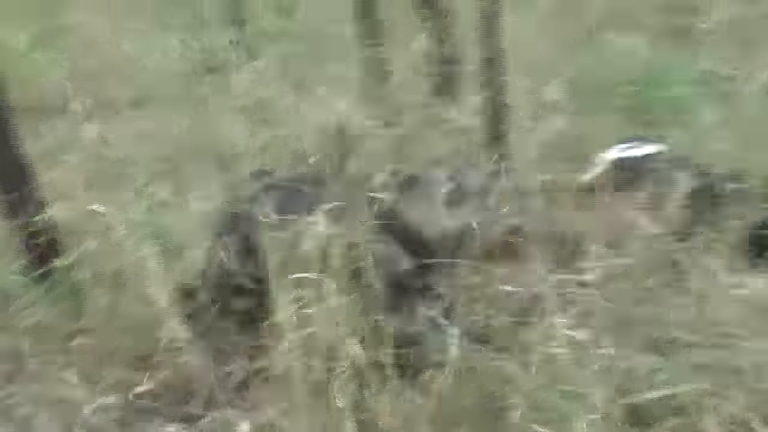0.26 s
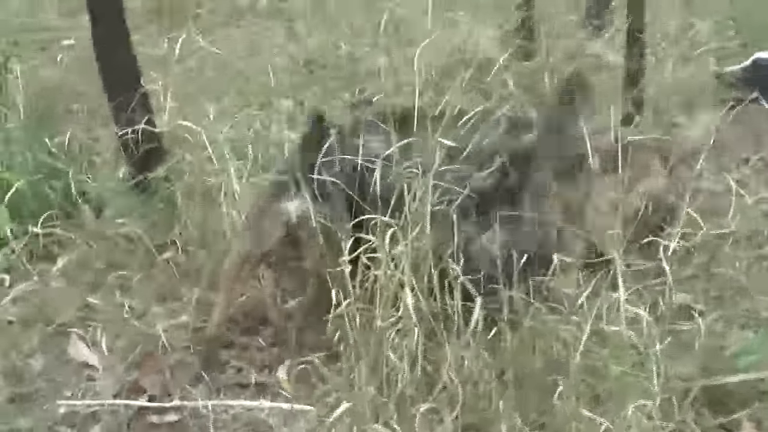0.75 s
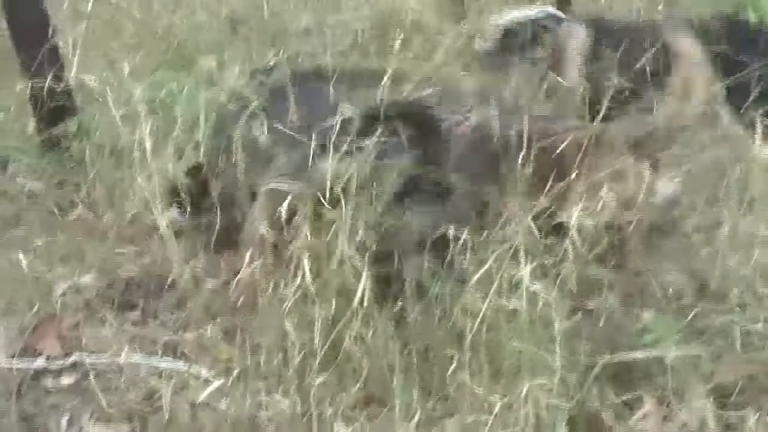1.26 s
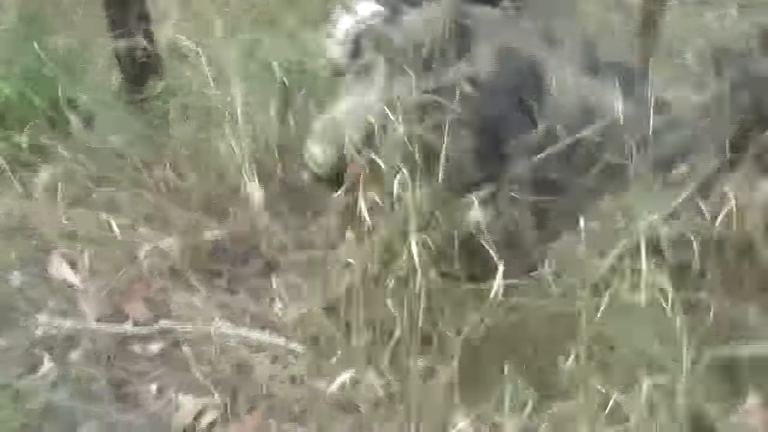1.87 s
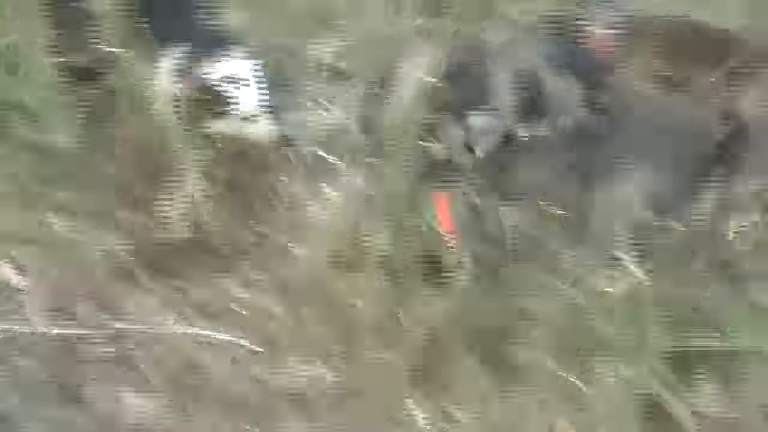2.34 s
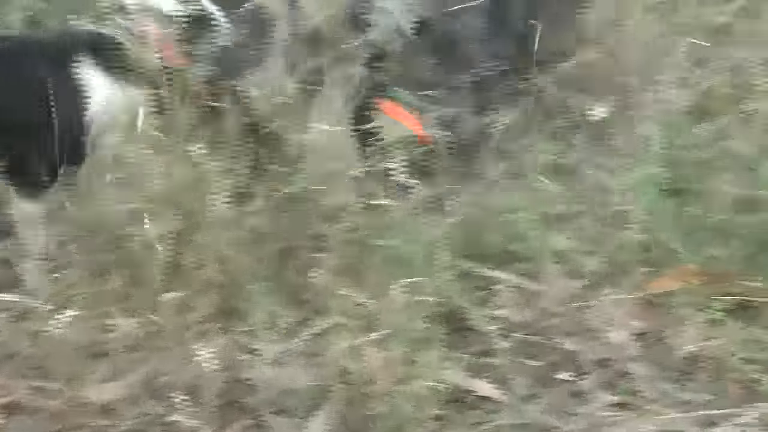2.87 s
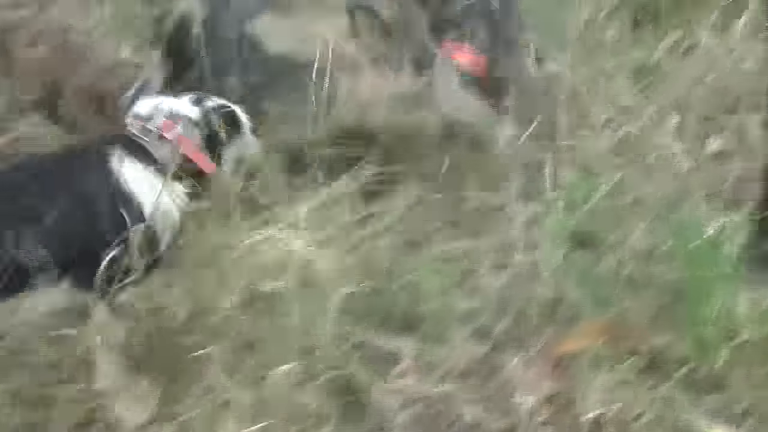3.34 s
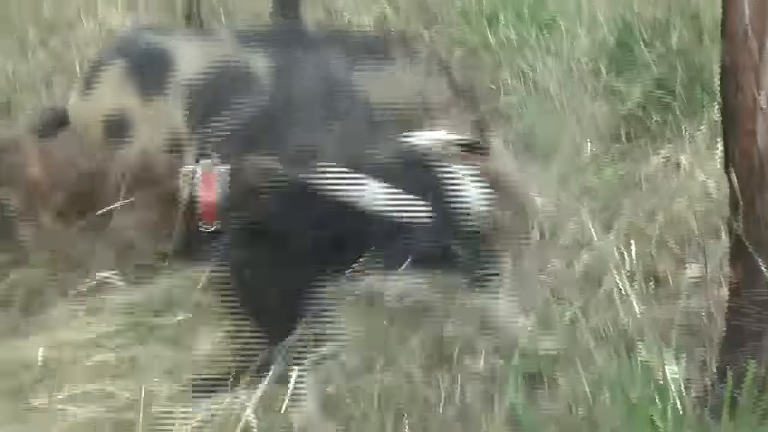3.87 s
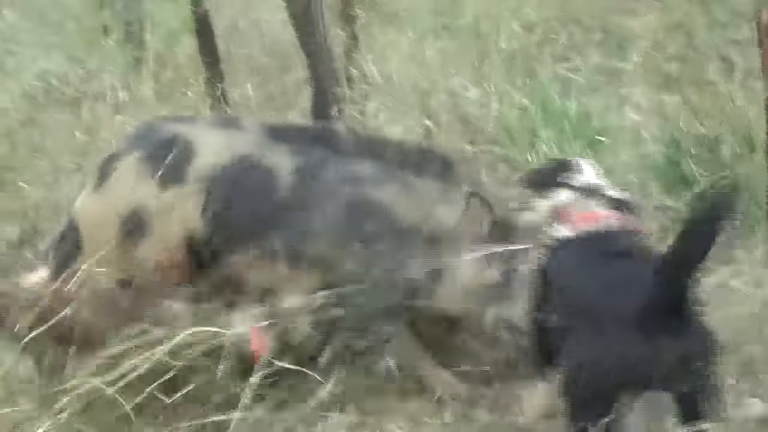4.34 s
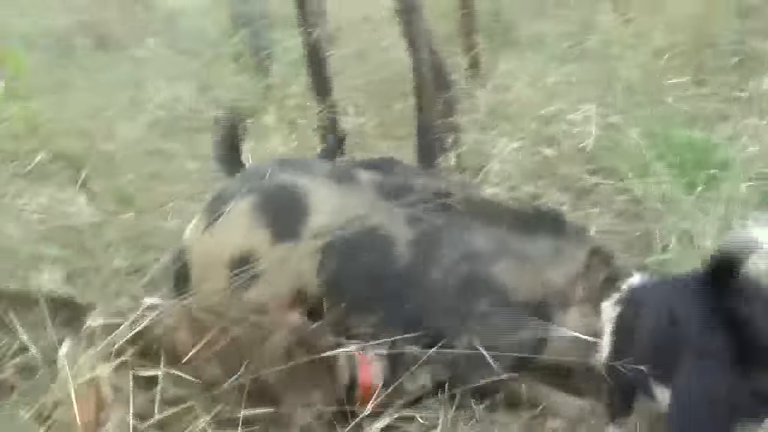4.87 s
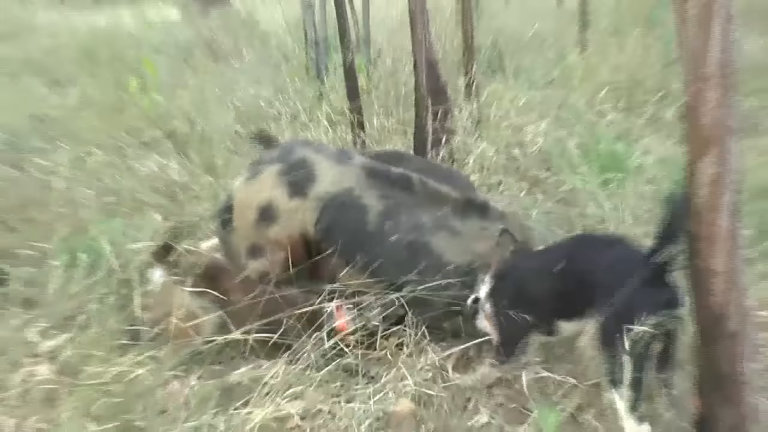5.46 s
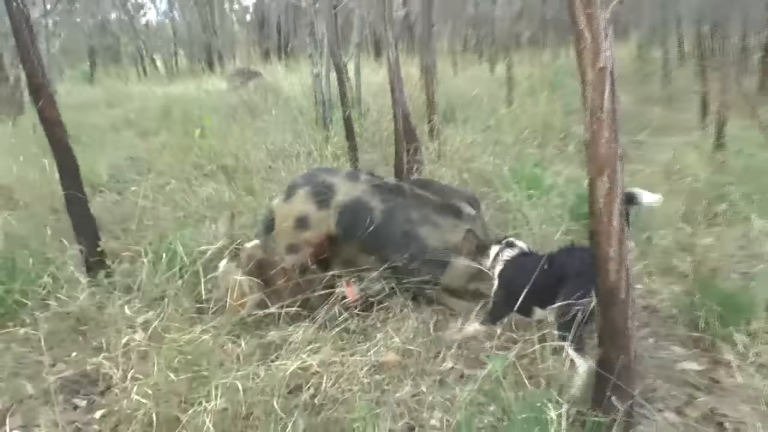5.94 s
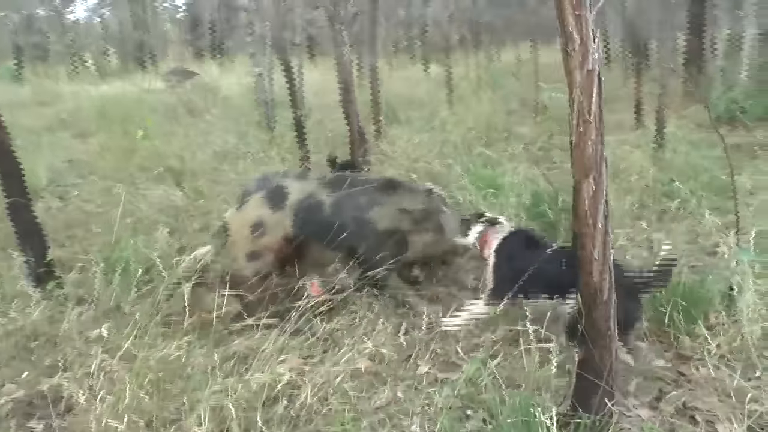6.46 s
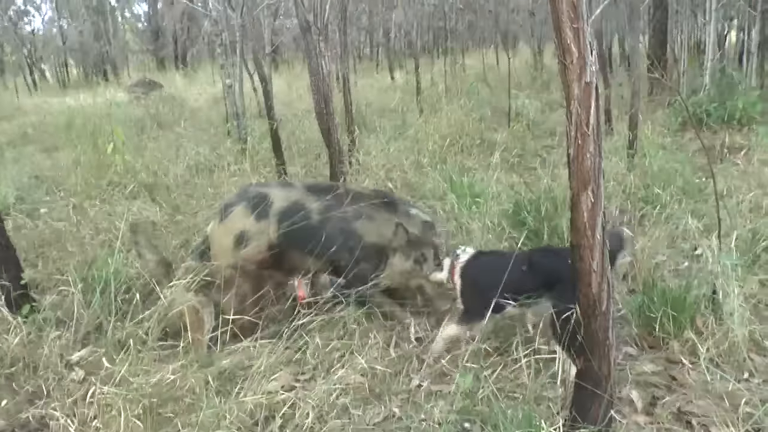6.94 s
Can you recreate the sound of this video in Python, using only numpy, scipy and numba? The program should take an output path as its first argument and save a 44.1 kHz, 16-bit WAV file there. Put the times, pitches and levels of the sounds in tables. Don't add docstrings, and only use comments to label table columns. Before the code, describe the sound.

Dogs hold a struggling pig in dry scrub: rough growls, a short squeal, stuttering grunts, two sharp yelps, snapping stalks and thuds.

```python
import sys
import numpy as np
from scipy import signal
from scipy.fft import rfft, irfft
from scipy.io import wavfile
from scipy.ndimage import uniform_filter1d
from numba import njit

SR = 44100
rng = np.random.default_rng(int(sys.argv[2]) if len(sys.argv) > 2 else 0)


def generate_wav(signal):
    frames = np.transpose(np.atleast_2d(signal))
    scaled = np.clip(frames, -1, 1) * 32767
    pcm = np.round(scaled).astype(np.int16)
    wavfile.write(sys.argv[1], SR, pcm)


def invert_db(x):
    u = np.asarray(x, float) / 20
    return 10 ** u


N = 317961
LOOP = 229320
T = np.arange(LOOP) / SR


def unit(x):
    return x / np.sqrt(np.mean(x ** 2))


def columns(rows, t):
    s, *rest = np.transpose(rows)
    return [np.interp(t, s, c) for c in rest]


def on_log(table, hz):
    f, v = np.transpose(table)
    return np.interp(np.log(hz + 1), np.log(f), v)


def walk(rate_hz, size=LOOP):
    k = max(int(SR / rate_hz), 1)
    return unit(uniform_filter1d(uniform_filter1d(rng.standard_normal(size), k), k))


@njit
def ring(x, hz, width_hz):
    y, band, low = np.empty(len(x)), 0., 0.
    for i in range(len(x)):
        g, k = np.tan(np.pi * hz[i] / SR), width_hz / hz[i]
        v = (band + g * (x[i] - low)) / (1 + g * (g + k))
        band, low, y[i] = 2 * v - band, low + 2 * g * v, k * v
    return y


def swells(rows, rest_db):
    power = invert_db(2 * rest_db)
    for s, rise_s, fall_s, db, *_ in rows:
        away = np.maximum((s - T) / abs(rise_s), (T - s) / abs(fall_s))
        power = power + invert_db(2 * (db - 12 * away))
    return 10 * np.log10(power)


# peak t/s, rise/s, fall/s, level/dB
THUDS = [(.39, .03, 0.12, -47), (.7, 0.51, 0.14, -43.5), (1.1, 0.15, 0.057, -46),
         (1.44, 0.052, 0.18, -37.5), (1.97, 0.41, 0.07, -41.5), (2.11, 0.024, 0.15, -34),
         (2.66, 0.2, 0.037, -41), (2.73, .11, 1, -51), (3.163, .021, 0.1, -35), (3.43, 0.024, 0.019, -32),
         (3.5, 0.026, 0.28, -43), (3.95, 0.1, 0.43, -42.5), (4.5, .6, .12, -54.5), (4.88, 0.13, 0.23, -40)]


def thuds():
    noise = rng.standard_normal(LOOP) + 0.44 * rng.standard_normal((2, LOOP))
    band = signal.butter(1, (45, 160), "band", fs=SR, output="sos")
    level_db = swells(THUDS, rest_db=-53.0) + 0.72 * walk(21.0)
    return invert_db(level_db) * unit(signal.sosfilt(band, noise))


# f/Hz, density/dB per Hz
GRASS_COLOUR = [(2000, 1), (3000, -1.5), (4600, 3), (6500, 7.5), (8500, 4.5), (11700, -0.5), (13000, 6),
                (16000, 12.5)]
# peak t/s, rise/s, fall/s, level/dB
THRASHES = [(.15, 0.38, 0.44, -32), (.47, 0.14, 1, -31), (.95, 0.6, 0.51, -37), (1.436, 0.039, 0.18, -30),
            (1.93, 0.22, 0.28, -25), (2.12, 0.1, 0.076, -23), (2.27, 0.12, 0.23, -21),
            (2.59, 0.11, 0.15, -21), (3.17, 0.029, 0.036, -22.5), (3.33, 0.35, 0.62, -25.5),
            (3.83, 0.083, 0.089, -29.5), (4.05, 0.23, 0.29, -29.5), (4.55, 0.74, 0.49, -29.5),
            (4.8, 0.068, 0.056, -28), (5.12, 0.27, 0.39, -30.5)]
# t/s, hold/s, recovery/s, level/dB
GAIN_DIPS = [
    (1.078, 0.098, 0.021, -4.5),
    (2.667, 0.036, 0.23, -13),
    (3.426, 0.04, 0.2, -14),
    (4.11, 0.11, 0.004, -15.5),
]


def grass(grains_per_s=2500, spread_db=2.5, hiss_db=3.0, flicker_db=2.0, dip_attack_s=0.045):
    dip_db = 0
    for s, hold_s, back_s, db in GAIN_DIPS:
        corners = s + np.cumsum([0, dip_attack_s, hold_s, back_s])
        dip_db = dip_db + np.interp(T, corners, [0, db, db, 0])
    rustle_db = swells(THRASHES, rest_db=-46.0) + dip_db
    chaff_db = -8.5 + 0.4 * dip_db

    size_db = spread_db * np.minimum(rng.exponential(size=(3, LOOP)), 4.5)
    grains = (rng.random((3, LOOP)) < grains_per_s / SR) * invert_db(size_db)
    crackle = signal.filtfilt([1], [1, -.9], grains) * rng.standard_normal((3, LOOP))
    both, *own = unit(crackle) + invert_db(hiss_db) * rng.standard_normal((3, LOOP))
    both, own = rfft(both), rfft(own)

    hz = np.fft.rfftfreq(LOOP, 1 / SR)
    colour = invert_db(on_log(GRASS_COLOUR, hz))
    out, sway_db = 0, flicker_db * walk(27.6)
    for lo, hi, db, share in ((2190, 3830, -6.5, 0.89), (4400, 7160, -3.5, 0.59), (9600, 11200, chaff_db, 0.91)):
        edge = colour / np.sqrt((1 + (lo / (hz + 1)) ** 12) * (1 + (hz / hi) ** 12))
        band = irfft((share * both + np.sqrt(1 - share ** 2) * own) * edge, LOOP)
        out = out + invert_db(rustle_db + db + sway_db + 1.27 * walk(100)) * unit(band)
    return out


# t/s, peak level/dB
TICKS = [(0.0912, -24), (0.1735, -11), (0.2862, -14), (0.3257, -22), (0.369, -21), (0.3818, -24),
         (0.3888, -24), (0.402, -17), (0.411, -11), (0.422, -18), (0.579, -6), (0.9812, -19), (1.299, -15),
         (1.3723, -25), (1.394, -16), (1.4127, -26), (1.429, -14), (1.4805, -10), (1.721, -27),
         (1.7474, -14.5), (2.032, -7), (2.092, -8), (2.1151, -13), (2.2243, -8), (2.585, 3), (2.7062, -18),
         (2.8679, -22), (3.1278, -24), (3.3423, -4), (3.4506, -22), (3.4675, -23), (3.4845, -34),
         (3.5084, -22), (3.6631, -18), (3.7504, -14), (4.2687, -22), (4.339, -10), (4.4149, -10),
         (4.4682, -10), (4.803, -13), (4.8724, -17), (4.9823, -17), (5.1607, -12)]


def ticks():
    out, t = np.zeros((2, LOOP + 512)), np.arange(512) / SR
    centre_hz = 5030 + 0 * t
    for (s, db), noise in zip(TICKS, rng.standard_normal((len(TICKS), 3, 512))):
        click = np.array([ring(noise[0] + 0.64 * own, centre_hz, 4400.0) for own in noise[1:]])
        click *= np.exp(-t / 0.0017)
        start = int(s * SR)
        out[:, start:start + len(t)] += invert_db(db - 4.5) * click / np.abs(click).max()
    return out[:, :LOOP]


# t/s, peak level/dB, f/Hz, decay/s
SNAPS = [(0.197, -9, 6560, 0.0099), (0.576, -11, 5140, 0.011), (0.9795, -11, 6950, 0.0082),
         (1.72, -17.5, 3920, 0.008), (2.032, -5, 6600, 0.0021), (2.585, -8, 5170, 0.0039),
         (3.341, -7, 6300, 0.0092), (3.754, -28, 6200, 0.0024), (4.468, -19, 6660, 0.0024),
         (4.982, 0.5, 5570, 0.00067), (4.994, -2, 5700, 0.00069), (0.288, -9, 6840, 0.00038),
         (5.167, -9, 6520, 0.0012)]
# t/s, peak level/dB, f/Hz, decay/s
SWISHES = [
    (0.362, -5.5, 4400, 0.034),
    (1.43, -11, 4050, 0.014),
    (1.888, -21, 3760, 0.0064),
    (2.114, -4, 4200, 0.0048),
    (3.135, -26, 5750, 0.029),
    (0.376, -5.5, 3260, 0.012),
]


def snaps():
    out, t = np.zeros(LOOP + 8192), np.arange(8192) / SR
    for rows, rise, width_hz in ((SNAPS, .18, 3100.), (SWISHES, .6, 2300.)):
        for (s, db, hz, decay_s), noise in zip(rows, rng.standard_normal((len(rows), 8192))):
            centre_hz = hz + 0 * t
            crack = ring(ring(noise, centre_hz, width_hz), centre_hz, width_hz)
            crack *= (1 - np.exp(-t / (rise * decay_s))) ** 2 * np.exp(-t / decay_s)
            out[int(s * SR):][:len(t)] += invert_db(db - 10.5) * crack / np.abs(crack).max()
    return out[:LOOP]


def resonance(source, air, db, hz, sharp_hz, hump_hz, broad_hz, usual_db):
    centre_hz = hump_hz + 0 * T
    hump = ring(ring(air, centre_hz, broad_hz), centre_hz, broad_hz)
    effort = np.clip(invert_db(db - usual_db), .2, 2)
    return invert_db(db) * (effort * unit(ring(source, hz, sharp_hz)) + unit(hump)) / np.sqrt(1 + effort ** 2)


# peak t/s, rise/s, fall/s, level/dB
CHEST_GROWLS = [(.17, 0.63, 0.096, -39), (.42, 0.096, 0.27, -31.5), (.58, 0.15, 0.31, -33),
                (1.065, 0.064, 0.15, -38), (1.29, 0.053, 0.025, -38), (1.5, 0.12, 0.048, -29.5),
                (1.75, 0.42, 0.53, -32.5), (2.2, 0.13, 0.26, -29), (2.64, 0.12, 0.064, -34.5),
                (3.01, 0.21, 0.1, -34.5), (3.15, 0.022, 0.6, -42.5), (3.52, 0.34, 0.19, -34),
                (4.02, 0.26, 1, -33.5), (4.478, 0.073, 0.093, -28.5), (4.62, 0.096, 0.14, -49),
                (5.08, 0.54, 0.45, -40.5)]
# t/s, f/Hz
CHEST_HZ = [(0, 336), (.8, 360), (1.5, 444), (1.62, 378), (1.9, 370), (2.2, 417), (3.3, 410), (3.53, 460),
            (3.97, 374), (4.5, 350), (5.2, 330)]
# peak t/s, rise/s, fall/s, level/dB
MOUTH_GROWLS = [(.274, 0.27, 0.89, -39), (.76, 0.12, 0.19, -43), (1.29, 0.088, 0.014, -30.5),
                (1.66, 0.17, 0.1, -34.5), (1.9, 0.09, 0.35, -39), (2.2, 0.12, 0.2, -33.5),
                (2.55, 0.12, 0.24, -35), (3.01, 0.81, 0.11, -32.5), (3.15, 0.018, 0.12, -27.5),
                (3.64, 0.084, 0.16, -39), (3.85, 0.18, 0.28, -38.5), (4.5, 1, 0.099, -48),
                (5.08, 0.44, 0.045, -37)]
# peak t/s, rise/s, fall/s, level/dB, snout f/Hz
SNORTS = [(.174, 0.25, 0.092, -34.5, 1800), (.44, 0.12, 0.19, -33.5, 1920), (.95, 0.42, 0.099, -41, 1760),
          (1.29, 0.29, 0.065, -30.5, 2070), (1.5, 0.18, 0.058, -36.5, 1400), (1.66, 0.05, 0.25, -42, 1350),
          (1.9, 0.089, 0.15, -28.5, 1830), (2.12, 0.16, 0.014, -30.5, 1340),
          (2.34, 0.011, 0.33, -32.5, 1370), (2.64, 0.065, 0.037, -29, 1980),
          (3.145, 0.016, 0.36, -30.5, 1380), (3.9, 0.15, 0.13, -31, 1640), (4.53, 1, 0.23, -37, 2020),
          (5.08, 0.38, 0.02, -36, 1880)]
# peak t/s, rise/s, fall/s, level/dB
GROANS = [
    (.25, 0.19, 0.094, -48),
    (1.08, 0.14, 0.084, -41.5),
    (2.18, 0.088, 0.057, -29),
    (2.3, 0.041, 0.028, -29.5),
    (4.45, 0.19, 0.12, -33.5),
]


def growl():
    cycles = np.cumsum(150 * np.exp(.25 * walk(50) + .25 * walk(3))) / SR
    beat_db = 2.5 * np.clip(rng.standard_normal(LOOP // 50), -1.5, 1.5)
    size = invert_db(beat_db)[cycles.astype(int)]
    pulses = unit(size * np.diff(np.floor(cycles), prepend=0))
    air = unit(size * (.5 + np.exp(-(cycles % 1) / 1.6)) * rng.standard_normal(LOOP))
    source = pulses + 0.23 * air

    chest_hz = columns(CHEST_HZ, T)[0] * np.exp(.04 * walk(6))
    mouth_hz = 830 * np.exp(.06 * walk(6))
    snout_hz = columns(SNORTS, T)[-1]
    chest = resonance(source, air, swells(CHEST_GROWLS, rest_db=-89), chest_hz, 120., 380., 800., usual_db=-33)
    mouth = resonance(source, air, swells(MOUTH_GROWLS, rest_db=-46), mouth_hz, 110., 950., 1400., usual_db=-31)
    snout = resonance(source, air, swells(SNORTS, rest_db=-78.0), snout_hz, 220., 1750., 2000., usual_db=-33)
    belly = invert_db(swells(GROANS, rest_db=-72)) * unit(ring(source, 202 + 0 * T, 62))
    return invert_db(1.2 * walk(26)) * (chest + belly + mouth + snout)


def duck(loud, knee_db=-26, depth=0.64, recover_s=0.046):
    level = uniform_filter1d(np.abs(loud), 882)
    pole = 1 / (recover_s * SR)
    level = np.maximum(level, signal.lfilter([pole], [1, pole - 1], level))
    return (1 + level / invert_db(knee_db)) ** -depth


def throb(rows, throb_hz, width_hz, edge_s):
    out, t = np.zeros(LOOP), np.arange(8192) / SR
    for s, length_s, db, from_hz, to_hz in rows:
        cycles = np.cumsum(throb_hz * np.exp(0.32 * walk(30, size=8192))) / SR
        gate = 0.23 + np.exp(-(cycles % 1) / 0.57)
        hz = from_hz + (to_hz - from_hz) * np.clip(t / length_s, 0, 1)
        air = ring(rng.standard_normal(8192), hz, width_hz)
        voice = unit(ring(gate * air, hz, 3 * width_hz))
        edges = np.clip(np.minimum(t, length_s - t) / edge_s, 0, 1)
        out[int(s * SR):][:8192] += invert_db(db) * voice * edges
    return out


# t/s, length/s, level/dB, from f/Hz, to f/Hz
MURMURS = [(1.502, 0.063, -44, 836, 810), (1.605, 0.12, -41.5, 940, 870), (1.624, 0.083, -37, 1420, 1380),
           (2.139, 0.13, -27, 805, 894), (2.165, 0.08, -33.5, 410, 402), (2.222, 0.089, -31.5, 1125, 1285),
           (3.595, 0.15, -34.5, 710, 823), (3.6, .11, -37.5, 1410, 1410), (1.79, 0.143, -38.5, 1290, 1160),
           (2.0, 0.049, -38, 1240, 1190), (2.03, 0.07, -35, 1440, 1450), (.85, .1, -44, 1080, 1150),
           (1.265, 0.1, -44, 2295, 2190), (1.29, 0.052, -39.5, 1060, 1150)]


def murmurs():
    return throb(MURMURS, throb_hz=49, width_hz=78, edge_s=0.0081)


# t/s, length/s, level/dB, from f/Hz, to f/Hz
PANTS = [
    (3.79, 0.151, -33, 1140, 1430),
    (2.87, 0.085, -36, 2130, 2220),
    (.715, 0.057, -36, 1030, 1520),
    (4.44, .11, -30, 490, 620),
    (3.15, 0.094, -36, 2300, 2200),
]


def pants():
    return throb(PANTS, throb_hz=49, width_hz=330., edge_s=0.0081)


# t/s, length/s, level/dB, from f/Hz, to f/Hz
RASPS = [(1.115, 0.044, -31, 930, 1010), (2.65, 0.027, -18, 1820, 1930), (2.7, 0.03, -20, 2100, 2020),
         (2.735, 0.051, -22.5, 1260, 1050), (2.765, 0.03, -20.5, 1430, 1610),
         (4.1, 0.068, -23.5, 2050, 1650), (4.105, 0.035, -31, 2520, 2650), (4.128, 0.056, -28, 1290, 1520),
         (4.148, 0.021, -17.5, 770, 780), (4.18, 0.052, -36, 760, 700), (4.2, 0.033, -24, 2050, 1400),
         (4.238, 0.027, -27, 1960, 1440)]


def rasps():
    return throb(RASPS, throb_hz=113, width_hz=160, edge_s=0.013)


GRUNTS = [
    (1.372, 1.391, 1.411, 1.4325, 1.4555, 1.48),
    (3.427, 3.45, 3.4668, 3.484),
    (4.053, 4.0688, 4.0887, 4.109),
    (4.7855, 4.803, 4.825, 4.8475, 4.8715),
]
# top level/dB, loudest slap, loss/dB per slap squared, upper throat/dB re chest
GRUNT_EFFORT = [
    (-9.5, 4.9, 0.35, 6),
    (-2.5, 1.0, 1.4, 4.5),
    (-5.5, 1.64, 2.9, 5.5),
    (-10.5, 2.9, 1.4, 11),
]
# t/s, peak level/dB, upper throat/dB, throat index
LONE_SLAPS = [
    (3.387, -14, -12, 1),
    (3.507, -23, 0, 1),
    (0.473, -17.5, 10, 4),
    (0.71, -15.5, 3, 4),
    (1.015, -22.5, 0, 5),
    (4.904, -26, -10, 4),
    (2.629, -20, 12, 4),
    (4.1095, -9, 14, 2),
]


def slaps():
    rows = list(LONE_SLAPS)
    for throat, (times, (db, top, arch_db, upper_db)) in enumerate(zip(GRUNTS, GRUNT_EFFORT)):
        for n, s in enumerate(times):
            lost_db = arch_db * (n - top) ** 2
            rows.append((s, db - lost_db, upper_db - 0.5 * lost_db, throat))
    return rows


# f/Hz, width/Hz, level/dB
GRUNT_RINGS = [
    [(260, 190, -6), (458, 78, 3), (589, 78, 0.5), (1110, 77, -15), (2080, 89, -5.5), (2495, 120, -10),
     (2850, 490, 3)],
    [(350, 67, -2.5), (447, 78, -10), (1455, 110, 7), (1757, 115, 8.5), (2300, 200, -10), (3160, 480, 3.5)],
    [(368, 77, -0.5), (600, 59, -3), (1450, 110, -8), (1830, 180, -9), (2440, 840, -7)],
    [(215, 70, -2), (410, 48, 2.5), (540, 90, -7), (780, 60, -12), (1380, 90, -9), (1830, 440, -6),
     (2300, 140, -9), (3350, 800, 0)],
    [(287, 104, 14.5), (604, 71, 19), (1620, 510, 21)],
    [(256, 120, 2), (523, 260, -3)],
]


def grunts(lead_s=.0035, lead_db=-21, lag_s=.0012, rise_s=.0004):
    out, t, rows = np.zeros(LOOP), np.arange(2048) / SR, slaps()
    for (s, db, upper_db, throat), slip in zip(rows, rng.standard_normal((len(rows), 8))):
        shape = np.zeros(len(t))
        for k, ((hz, width_hz, ring_db), z) in enumerate(zip(GRUNT_RINGS[throat], slip)):
            level = (-1) ** k * invert_db(ring_db + upper_db * (hz > 1000))
            tone = np.sin(2 * np.pi * hz * (1 + .012 * z) * t)
            shape += level * np.exp(-np.pi * width_hz * t) * tone
        shape *= 1 - np.exp(-t / rise_s)
        shape *= invert_db(db) / np.abs(shape).max()
        out[int((s + lag_s) * SR):][:len(t)] += shape
        out[int((s - lead_s) * SR):][:len(t)] += invert_db(lead_db) * shape
    return out


def call(rows, throat, bright_db, per_db, hoarse=0):
    i = np.arange(int(rows[0][0] * SR), int(rows[-1][0] * SR))
    hz, db, rough = columns(rows, i / SR)
    tilt_db = bright_db + per_db * (db - db.max())
    rough = np.clip(rough + hoarse, 0, 1)
    phase = 2 * np.pi * np.cumsum(hz * (1 + .06 * rough * walk(250, size=len(i)))) / SR

    k = np.arange(1, 29)[:, None] / 2
    halves = np.where(k % 1 > 0, .3 * rough, 1)
    waver_db = 9 * rough * np.array([walk(260, size=len(i)) for _ in k])
    gains = halves * invert_db(waver_db + on_log(throat, k * hz) + tilt_db * np.log2(k * hz / 1200))
    tones = np.sum(gains * np.sin(k * phase + 0.694 * k ** 2), axis=0)
    tones /= np.sqrt(np.sum(gains ** 2, axis=0) / 2)

    throat_gain = invert_db(on_log(throat, np.fft.rfftfreq(len(i), 1 / SR)))
    air = unit(irfft(rfft(rng.standard_normal(len(i))) * throat_gain, len(i)))
    voice = invert_db(db) * (tones + 1.1 * rough * air) / np.sqrt(1 + 1.2 * rough ** 2)
    out = np.zeros(LOOP)
    out[i] = np.minimum((i[-1] - i) / (.004 * SR), 1) * voice
    return out


# t/s, f/Hz, level/dB, roughness 0-1
MOAN = [
    (3.295, 274, -43, .05),
    (3.315, 280.7, -30, 0.02),
    (3.345, 265.5, -33.5, 0.02),
    (3.37, 229, -29, 0.05),
    (3.39, 213.6, -21.5, 0.71),
    (3.415, 202, -29, 0.37),
    (3.43, 194, -25, 0.44),
]
# f/Hz, level/dB
MOAN_THROAT = [(120, -5), (250, 1), (520, -9), (700, -28), (2000, -45)]


def moan():
    return call(MOAN, MOAN_THROAT, bright_db=5.5, per_db=-1)


# f/Hz, level/dB
YELP_THROAT = [(250, -42), (600, -4.5), (1000, 2.5), (1450, 9.5), (2050, 0.5), (2600, -27), (3200, -53),
               (6000, -71)]
# t/s, f/Hz, level/dB, roughness 0-1
YELP_START = [
    (2.647, 408, -24, 0.46),
    (2.652, 442, -20, 0.3),
    (2.66, 536, -13, 0.43),
    (2.668, 680, -12.5, 0.046),
    (2.686, 780, -13, .03),
    (2.696, 810, -37, .13),
]
YELP = [
    (2.684, 461, -25, 0.05),
    (2.692, 566, -16, .05),
    (2.714, 745, -14, 0.05),
    (2.723, 770, -23, 0.3),
    (2.735, 765, -15, 0.15),
    (2.754, 700, -18, 0.3),
    (2.77, 571, -21, 0.35),
    (2.782, 670, -22, 0.1),
    (2.804, 530, -24, 0),
]
YELP_SLIP = [
    (2.704, 1017, -27, .2),
    (2.712, 1064, -24, 0.23),
    (2.73, 796, -20, 0.05),
    (2.74, 760, -26, .2),
]


def dog_yelp():
    return (call(YELP_START, YELP_THROAT, bright_db=-2.0, per_db=3.0)
            + call(YELP, YELP_THROAT, bright_db=5.5, per_db=1.5, hoarse=.2)
            + call(YELP_SLIP, YELP_THROAT, bright_db=4.0, per_db=0.6, hoarse=.2))


# f/Hz, level/dB
BARK_THROAT = [(250, -46), (650, -11), (1000, 0), (1400, -7.5), (1900, -5), (2600, -12), (3200, -40),
               (6000, -96)]
# t/s, f/Hz, level/dB, roughness 0-1
BARK = [
    (4.1, 513, -25, 0.74),
    (4.112, 611, -15, 0.99),
    (4.126, 716, -15, 0.29),
    (4.138, 897, -13, 0.26),
    (4.158, 984, -16, 0.074),
    (4.183, 1015, -14, 0.042),
    (4.19, 980, -34, .1),
]
BARK_BREAK = [
    (4.178, 1050, -30, .3),
    (4.19, 1220, -16, .35),
    (4.202, 1330, -18, .2),
    (4.214, 860, -17.5, .1),
    (4.222, 780, -36, .1),
]
BARK_END = [
    (4.212, 1400, -32, .2),
    (4.218, 1200, -18, .15),
    (4.227, 770, -14.5, 0),
    (4.252, 625, -21, .05),
    (4.26, 680, -31, .2),
    (4.274, 800, -40, .2),
]


def dog_bark():
    parts = (BARK, BARK_BREAK, BARK_END)
    return sum(call(part, BARK_THROAT, bright_db=-9.5, per_db=0.8, hoarse=.16) for part in parts)


# f/Hz, level/dB
PIG_THROAT = [(520, 0), (950, 2), (1550, 0), (2150, 13.5), (2650, 0), (3300, -30), (4000, -34), (8000, -30)]
PIG_NOSE = [(2900, -45), (3450, -22), (4000, 10), (4350, -18), (4900, -1), (5300, -8), (5900, -24),
            (8000, -40)]
HOARSE_THROAT = [(400, -22), (790, 5), (1000, 5), (1400, -9), (1900, -5), (2500, 1.5), (2900, -9),
                 (3250, -40)]
# t/s, f/Hz, level/dB, roughness 0-1
SQUEAL_START = [
    (1.077, 401, -36, 0.6),
    (1.088, 432, -16, 1),
    (1.1, 464, -14.5, 0.9),
    (1.107, 470, -20, .7),
    (1.112, 475, -15, .5),
    (1.119, 480, -24, .6),
    (1.126, 485, -17.5, 0.5),
    (1.14, 495, -21, .5),
    (1.16, 502, -36, 0.7),
]
SQUEAL = [
    (1.128, 490, -30, 0.5),
    (1.146, 517, -17, .15),
    (1.165, 524, -13, 0.05),
    (1.192, 527, -14.5, 0.05),
    (1.208, 545, -12.5, 0.05),
    (1.232, 572, -18.5, .1),
    (1.24, 530, -12, 0.12),
    (1.249, 495, -22, 0.6),
    (1.268, 460, -36, 1),
]
SQUEAL_TAIL = [
    (1.24, 530, -30, .3),
    (1.249, 500, -21, .35),
    (1.259, 430, -24, .5),
    (1.273, 360, -38, .8),
]


def pig_squeal():
    return (call(SQUEAL_START, HOARSE_THROAT, bright_db=8.0, per_db=1.5)
            + call(SQUEAL, PIG_THROAT, bright_db=0.5, per_db=-0.4)
            + invert_db(-28) * call(SQUEAL, PIG_NOSE, bright_db=-2.0, per_db=-6.0)
            + call(SQUEAL_TAIL, HOARSE_THROAT, bright_db=0.5, per_db=0.))


def scene():
    calls = pig_squeal() + dog_yelp() + dog_bark() + rasps()
    throats = growl() * duck(calls) + murmurs() + pants() + moan()
    sharp = calls * invert_db(np.array([[2.5], [-.8]])) + grunts() + snaps()

    t = np.arange(16384) / SR
    trunks = rng.standard_normal((2, len(t))) * np.exp(-t / 0.058) * (1 - np.exp(-t / 0.00013))
    echo = signal.fftconvolve(invert_db(-48) * sharp + invert_db(-36) * throats, trunks, axes=1)[:, :LOOP]

    rustle = grass() * invert_db(np.array([[.4], [-.3]]))
    return np.tile(sharp + throats + echo + rustle + ticks() + thuds(), 2)[:, :N]


# f/Hz, level/dB
MIC_BALANCE = [(40, -8), (110, 0.5), (300, -11), (700, -8.5), (1800, -5.5), (4400, -10), (8000, -6),
               (12000, -16)]
# f/Hz, phase/rad
MIC_PHASE = [(100, 0.1), (430, 1), (1200, 0.45), (2500, 0.076), (16000, 0.05)]


def mic_ports(hz, top_hz=16000):
    left = invert_db(on_log(MIC_BALANCE, hz)) * np.exp(1j * on_log(MIC_PHASE, hz))
    return np.array([left, 1 + 0 * left]) * 2 / (1 + left) * (hz < top_hz)


def roll_off(x):
    return signal.sosfilt(signal.butter(12, 16530, fs=SR, output="sos"), x)


def record(dry, skew=0.23):
    hz = np.fft.rfftfreq(N, 1 / SR)
    bent = rfft(dry) + skew * rfft(dry ** 2) / (1 + (hz / 2500.) ** 2)
    bent = bent * hz / np.sqrt(hz ** 2 + 37.0 ** 2)
    mix = np.clip(irfft(bent * mic_ports(hz), N), -.97, .97)
    return roll_off(mix)


dry = scene()
out = record(dry)
generate_wav(out)
```